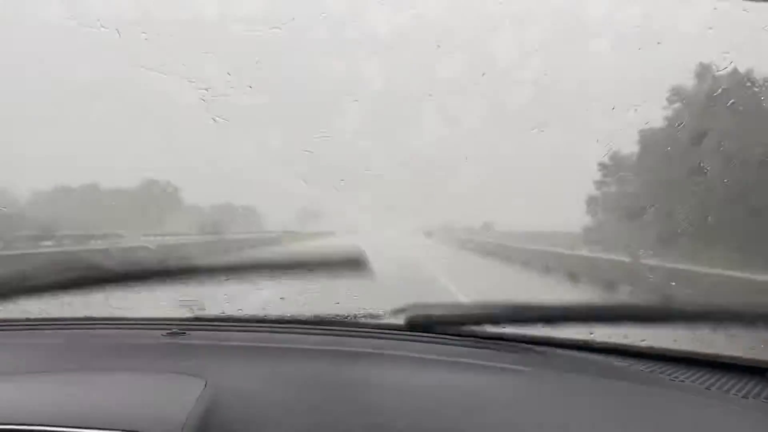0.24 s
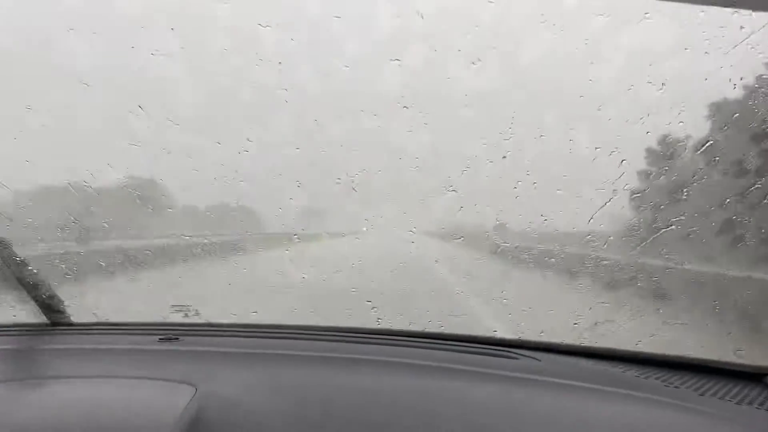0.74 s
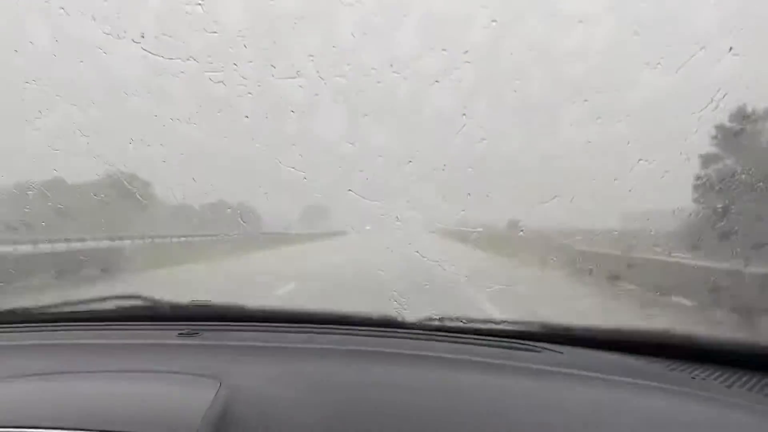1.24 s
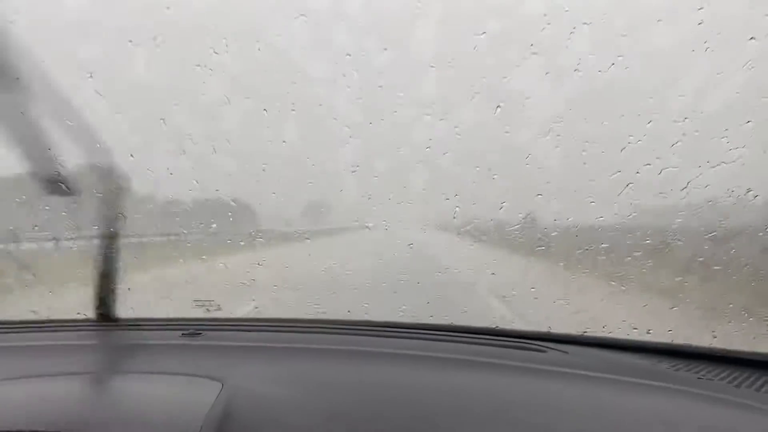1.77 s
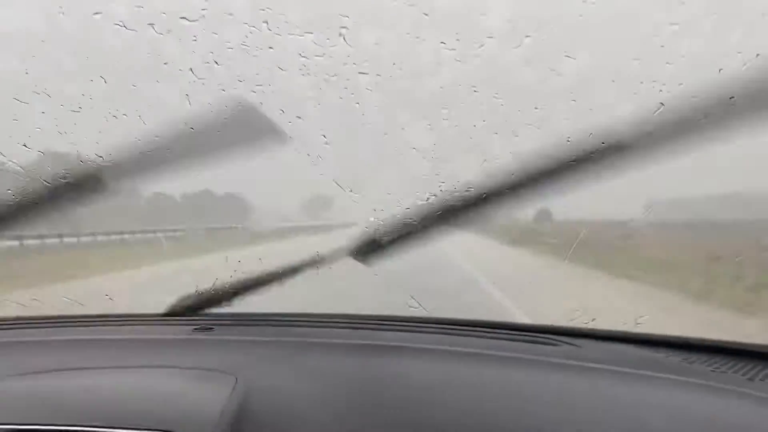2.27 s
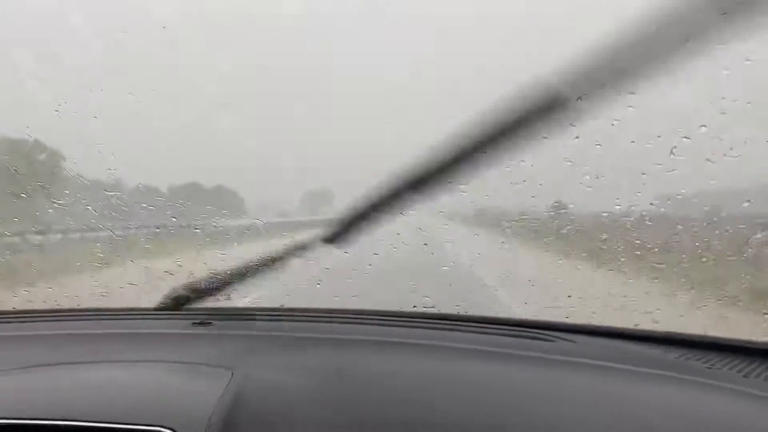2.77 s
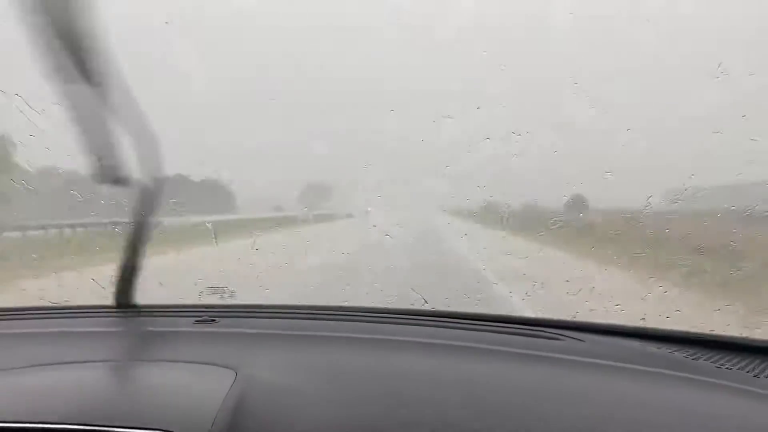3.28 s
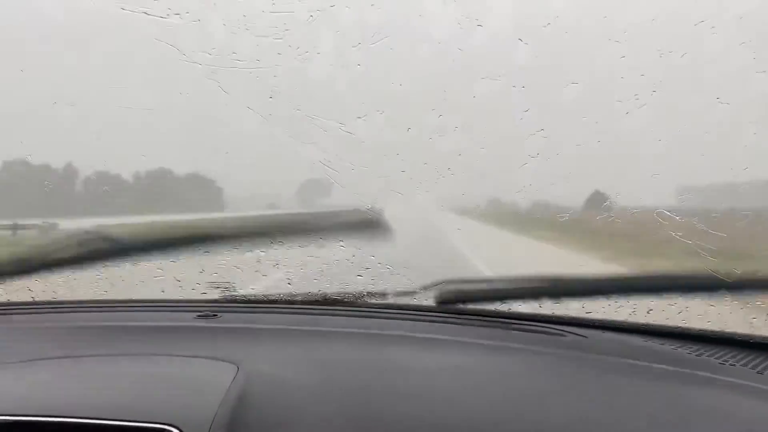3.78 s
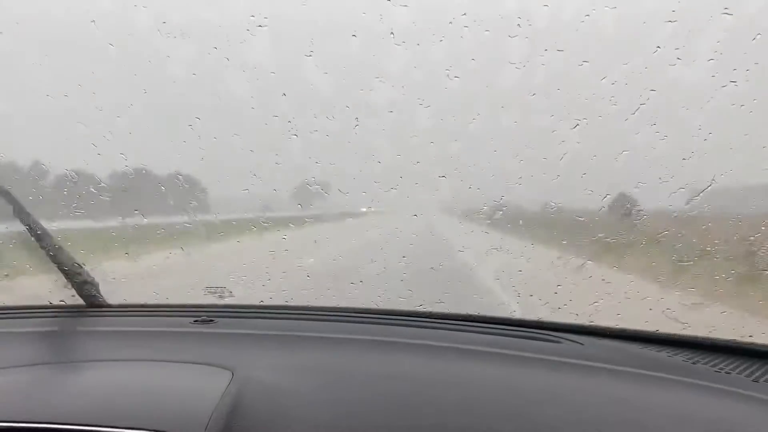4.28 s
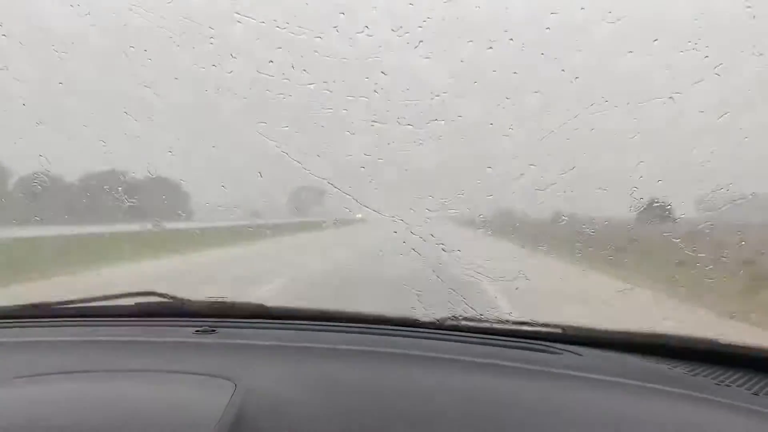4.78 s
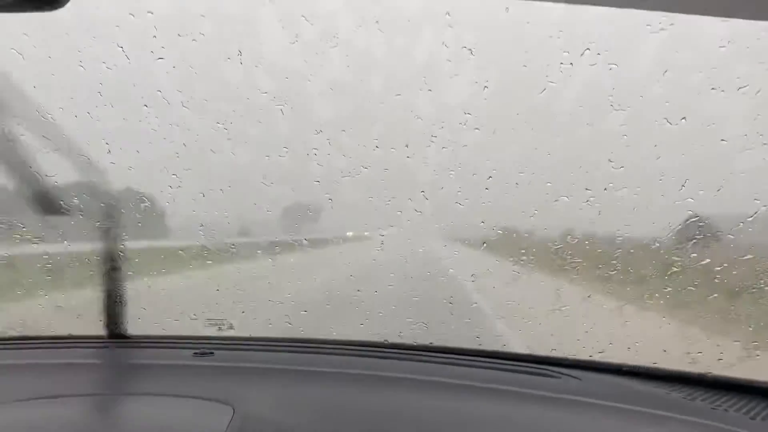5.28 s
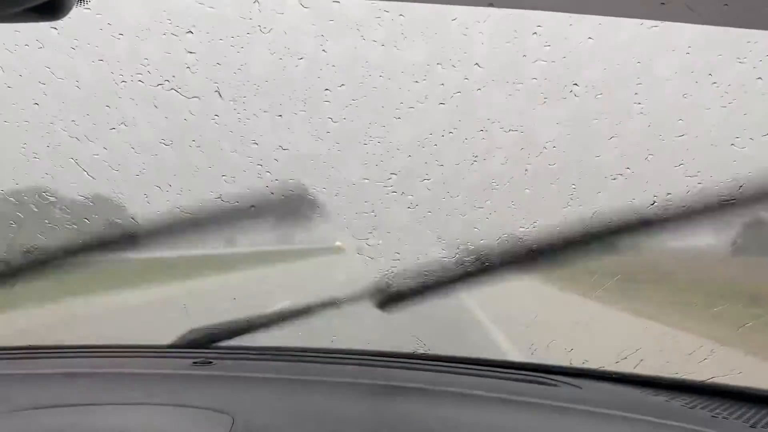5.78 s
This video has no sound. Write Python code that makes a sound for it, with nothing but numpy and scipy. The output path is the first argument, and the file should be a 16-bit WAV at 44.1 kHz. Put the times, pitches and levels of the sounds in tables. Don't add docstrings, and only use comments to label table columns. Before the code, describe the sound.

Continuous heavy rain on glass and sheet metal, a rattling hiss full of tiny ticks, over muffled wet-road tyre noise. Bumps make the cabin air thud softly, strongest near the start and again after two seconds, then rarely. Irregular fat drops crack against the windshield with a brief ring and spray. Heard from inside, close and slightly wide.

```python
import sys
import numpy as np
from scipy import signal
from scipy.fft import rfft, irfft, next_fast_len
from scipy.io import wavfile
from scipy.ndimage import uniform_filter1d

SR = 44100
rng = np.random.default_rng(int(sys.argv[2]) if len(sys.argv) > 2 else 0)


def store_pcm(level_fs):
    pcm = np.round(np.clip(level_fs, -1, 1) * 32767).astype(np.int16)
    wavfile.write(sys.argv[1], SR, np.atleast_2d(pcm).T)


def elevation(decibels):
    levels = np.asarray(decibels, float)
    return 10 ** (levels / 20)


N = 265923
HZ = np.fft.rfftfreq(next_fast_len(N), 1 / SR)

# pitch in Hz, level in dB per Hz.
GLASS = [(300, -32.5), (800, -8), (1500, -6.5), (2000, -3), (2500, -2), (3300, -4), (4300, -4.5),
         (4900, -7), (5600, -9.5), (7000, -10.5), (8500, -13.5), (11000, -17.5), (13000, -19),
         (15500, -24.5)]
# time in seconds, level in dB.
RAIN = [(0.0, -24), (0.15, -24.5), (1.81, -25.5), (1.86, -26.5), (2.15, -25), (3.21, -27.5), (3.46, -25.5),
        (3.73, -27.5), (3.79, -26.5), (5.88, -26), (5.91, -23.5), (6.03, -26)]


def evened(x):
    return x / np.sqrt(np.mean(x ** 2) + 1e-20)


def read(points, column=1):
    table = np.transpose(points)
    return np.interp(np.log(HZ + 1), np.log(table[0] + 1), table[column])


def drive(points):
    s, db = np.transpose(points)
    return np.interp(np.arange(N) / SR, s, db)


def peak(hz, width):
    return 1 / (1 + 1j * (HZ - hz) * 2 / width) ** 2


def causal(db):
    log_gain = np.log(elevation(db))
    circle = np.concatenate([log_gain, log_gain[-2:0:-1]])
    return np.exp(np.conj(signal.hilbert(circle)))[:len(HZ)]


def filtered(x, gain):
    size = next_fast_len(N)
    return irfft(rfft(x, size) * gain, size)[..., :N]


def wander(top_hz):
    return evened(filtered(rng.standard_normal(N), 1 / (1 + (HZ / top_hz) ** 2)))


def patchy(x, patch_db):
    z = signal.stft(x, nperseg=256)[2]
    field = rng.standard_normal(z.shape[1:])
    field = uniform_filter1d(field, size=4, axis=0)
    field = uniform_filter1d(field, size=9, axis=1)
    return signal.istft(z * elevation(patch_db * evened(field)), nperseg=256)[1][:, :N]


def ports(pair):
    # pitch in Hz, likeness of the ports from 0 to 1, right below left in dB,
    # lead of the right port in radians.
    port_pair = [(60, .96, 2.5, 0), (150, .85, 1.5, 0), (330, .7, 3.5, 0), (600, .35, 3.5, 0),
                 (1200, .1, 1.5, 0), (1400, .35, 1.0, -3), (1800, .2, 1.5, .8), (2300, .65, 2.2, -.2),
                 (2800, .7, 4.5, -.6), (4000, .77, 4.2, -.15), (5500, .45, 3.0, -.1), (6300, .85, .8, 0),
                 (7000, .968, 0, .1)]
    in_step_hz, turn_hz = 6925, 4190
    same = np.clip(read(port_pair, column=1), 0, 1)
    delay_lead = 2 * np.pi * (HZ - in_step_hz) / turn_hz
    lead = np.where(HZ > port_pair[-1][0], delay_lead, read(port_pair, column=3))
    tilt = elevation(read(port_pair, column=2) / 2)
    shared = filtered(pair[0], same * np.exp(1j * lead) / tilt)
    own = filtered(pair[1], np.sqrt(1 - same ** 2) / tilt)
    return np.array([filtered(pair[0], tilt), shared + own])


def roar():
    # pitch in Hz, level in dB per Hz.
    tyre_colour = [(60, -10.5), (120, 2), (200, -1.5), (330, -6.5), (420, -3.5), (480, -8.5), (570, -5.5),
                   (900, -9.5), (1400, -12), (2500, -50), (6000, -60)]
    # pitch in Hz, width in Hz, left level in dB, right level in dB.
    panels = [(158, 34, 1, 6.5), (200, 16, -11, -30), (331, 130, -4.5, -5), (634, 24, -5, -0.5),
              (661.6, 23, 0, -1.5), (760, 29, -26.5, -21), (1310, 68, -32, -38)]
    rings = 0
    for hz, width, left_db, right_db in panels:
        rings = rings + abs(elevation([[left_db], [right_db]]) * peak(hz, width)) ** 2
    colour = np.sqrt(elevation(read(tyre_colour)) ** 2 + rings)
    rain_db = drive(RAIN)
    level_db = -25.5 + 0.66 * (rain_db - rain_db.mean()) + 0.67 * wander(top_hz=13.7)
    noise = patchy(ports(rng.standard_normal((2, N))), patch_db=1.18)
    return elevation(level_db) * evened(filtered(noise, colour))


def shake():
    # pitch in Hz, width in Hz, level in dB.
    cabin = [(30, 20, -13), (48, 29, 0), (71.4, 37, -5), (91, 40, 3.5), (108, 16, -8)]
    # time in seconds, roughness in dB.
    road = [(0, -28), (0.35, -18), (0.62, -24.5), (1.25, -26.5), (1.7, -21.5), (1.95, -29), (2.3, -22.5),
            (2.7, -30), (4.4, -26.5), (5.2, -29), (6.03, -27.5)]
    modes = np.sqrt(sum(abs(elevation(db) * peak(hz, width)) ** 2 for hz, width, db in cabin))
    return elevation(0.5 + drive(road)) * evened(filtered(rng.standard_normal((2, N)), modes))


def booms():
    # time of the top in seconds, peak in dB, pitch in Hz, length in seconds at half height.
    upper = [(0.051, -13, 83, 0.045), (0.126, -15, 100, 0.03), (0.175, -9, 98, 0.023),
             (0.26, -10, 91, 0.015), (0.3, -4.5, 91, 0.027), (0.4, -4.5, 86.6, 0.026),
             (0.424, -8.5, 88, 0.027), (0.485, -13.5, 92, 0.03), (0.717, -19, 103, 0.024),
             (0.938, -25, 95, 0.019), (0.969, -16, 103, 0.023), (1.059, -14, 98, 0.029),
             (1.18, -14, 92.5, 0.023), (1.226, -20.5, 98, 0.057), (1.379, -10, 103, 0.015),
             (1.509, -16.5, 91, 0.072), (1.624, -16, 89, 0.042), (1.699, -18, 104, 0.048),
             (1.733, -10.5, 102, 0.018), (1.804, -12.5, 104, 0.028), (1.866, -15.5, 97, 0.052),
             (1.929, -22, 97, 0.031), (2.065, -15.5, 89.5, 0.025), (2.122, -19, 98, 0.04),
             (2.284, -8.5, 91, 0.03), (2.394, -7.5, 94.6, 0.04), (2.454, -15, 90, 0.024),
             (4.015, -23, 102, 0.036), (4.11, -20, 85, 0.03), (5.222, -16, 94, 0.013)]
    # time of the top in seconds, peak in dB.
    lower = [(0.094, -12.5), (0.283, -19), (0.405, -11.5), (0.482, -12.5), (1.525, -19), (1.688, -20),
             (1.928, -19), (2.296, -20), (2.419, -14), (2.481, -16), (5.97, -18.5)]
    lower_hz, lower_s = 48.4, 0.056
    jolts = list(upper) + [(s, db, lower_hz, lower_s) for s, db in lower]
    t, out = np.arange(N) / SR, np.zeros((2, N))
    for s, db, hz, length in jolts:
        near = slice(max(round((s - .2) * SR), 0), round((s + .2) * SR))
        u = t[near] - s
        bell = elevation(np.maximum(-24 * (u / length) ** 2, -200))
        turns = hz * u + rng.random() + np.array([[0], [.25]])
        out[:, near] += elevation(db) * bell * np.cos(2 * np.pi * turns)
    return out


def splats():
    # start in seconds, peak in dB, pitch of the ring in Hz.
    large_drops = [(0.4866, -9, 2080), (0.9173, -21, 2140), (0.9508, -4, 3500), (0.9522, -7, 4200),
                   (1.651, -9.5, 2580), (1.7275, -8.5, 2420), (1.7856, -11, 2430), (2.0884, -15, 2310),
                   (2.3062, -11, 2550), (2.3765, -17, 2480), (2.5305, -17, 3230), (2.6574, -9.5, 2980),
                   (3.0684, -13, 3340), (3.3368, -16, 2720), (3.543, -10, 2570), (3.6501, -22, 2660),
                   (3.7627, -17, 2210), (3.8384, -12, 2480), (4.168, -13, 3640), (4.2248, -10, 2710),
                   (4.274, -17, 3640), (4.2991, -11, 2380), (4.7082, -11, 3750), (5.1354, -9.5, 2440),
                   (5.3228, -12, 2380), (5.7098, -14, 2460), (5.8825, -14, 2540), (6.0043, -10, 3870)]
    spray_db = -22
    dull, bright = np.zeros((2, N + 2000)), np.zeros((2, N + 2000))
    t = np.arange(2000) / SR
    fade = elevation(-60 * t / .016) + elevation(-10.5 - 60 * t / 0.18)
    for s, db, hz in large_drops:
        burst = rng.choice([-1., 1.], (2, 2000)) * fade
        ring = .5 * np.sin(2 * np.pi * hz * t) * elevation(-60 * t / 0.007)
        start = round(s * SR)
        dull[:, start:start + 2000] += elevation(db - 2.5) * (burst + ring)
        bright[:, start:start + 2000] += elevation(db + spray_db) * burst
    spray_colour_db = -40 / (1 + (HZ / 6500) ** 4) - 6 * HZ / 15000
    slap = filtered(dull[:, :N], causal(0.7 * read(GLASS)))
    return slap + filtered(bright[:, :N], causal(spray_colour_db))


def strikes(per_s, spread_db):
    size = elevation(spread_db * np.minimum(rng.exponential(1, N), 4))
    hit = rng.random(N) < per_s / SR
    return size * hit * rng.choice([-1., 1.], (2, N))


def drop_sound(hits, t60, wet_db, count=3):
    t = np.arange(2500) / SR
    spot = rng.integers(0, count, N)
    smear = rng.standard_normal((count, 2, 2500)) * elevation(-60 * t / t60)
    smear *= elevation(wet_db) / np.linalg.norm(smear[0, 0])
    smear[..., 0] += 1
    out = 0
    for k in range(count):
        out = out + signal.oaconvolve(hits * (spot == k), smear[k], axes=1)[:, :N]
    return out


def downpour():
    # pitch in Hz, width in Hz, lift in dB.
    windshield = [(2380, 390, 1.5), (3140, 390, 2), (4420, 1400, -0.5)]
    hiss = 0.62
    drops = evened(drop_sound(strikes(per_s=2600, spread_db=4.5), t60=0.032, wet_db=1.0))
    ticks = evened(drop_sound(strikes(per_s=290, spread_db=3.5), t60=0.029, wet_db=-8.0))
    mix = np.sqrt(1 - hiss) * drops + np.sqrt(hiss) * rng.standard_normal((2, N))
    mix += elevation(-4) * filtered(ticks, causal(-14 / (1 + (HZ / 6000) ** 2)))
    gusts_db = 0.5 * wander(top_hz=47) + 0.34 * wander(top_hz=44)
    mix = patchy(mix, patch_db=1.0) * elevation(gusts_db)
    rings_db = sum(db * abs(peak(hz, width)) for hz, width, db in windshield)
    return elevation(1.52 + drive(RAIN)) * evened(filtered(mix, causal(read(GLASS) + rings_db)))


def scene():
    return ports(downpour() + splats() + shake() + booms()) + roar()


def top_cut(x):
    return signal.sosfilt(signal.butter(12, 16930, fs=SR, output="sos"), x)


def record(dry):
    knee, room = .7, .22
    over = np.maximum(abs(dry) - knee, 0)
    held = dry - np.sign(dry) * (over - room * np.tanh(over / room))
    return top_cut(filtered(held, HZ < 15770))


dry = scene()
out = record(dry)
store_pcm(out)
```